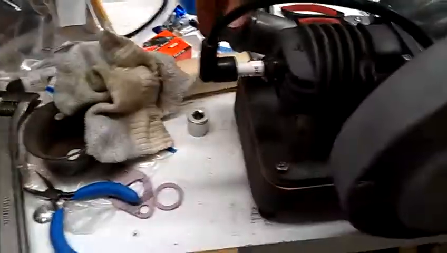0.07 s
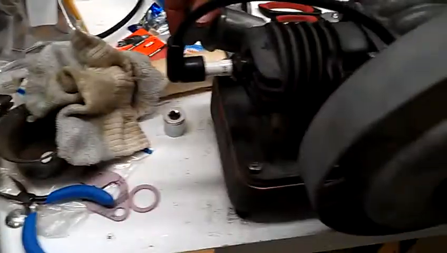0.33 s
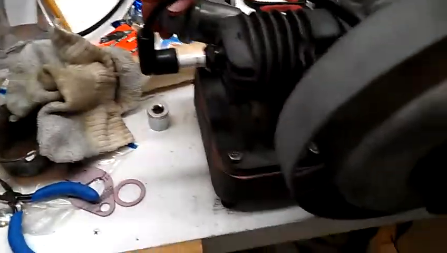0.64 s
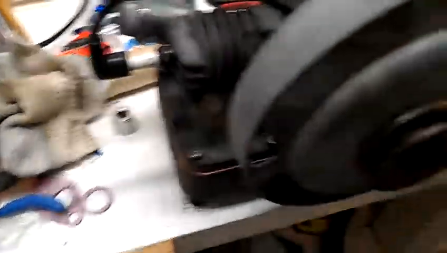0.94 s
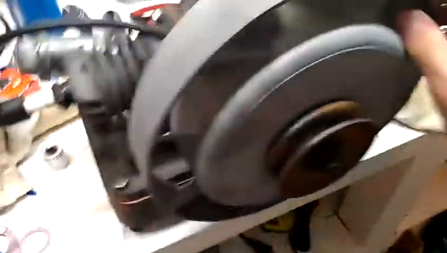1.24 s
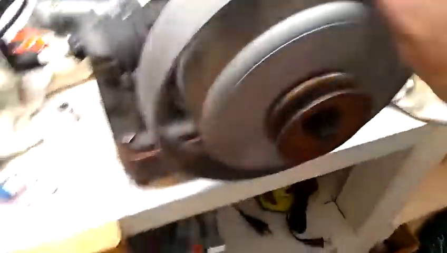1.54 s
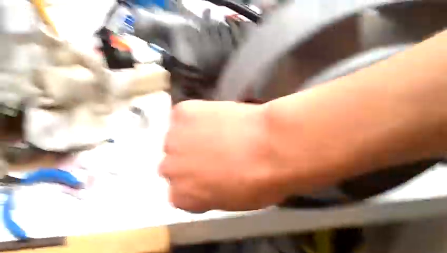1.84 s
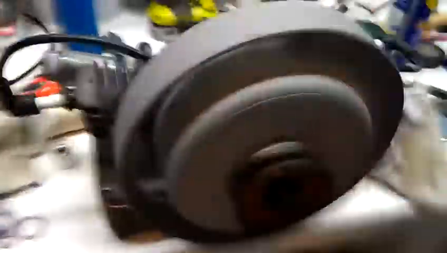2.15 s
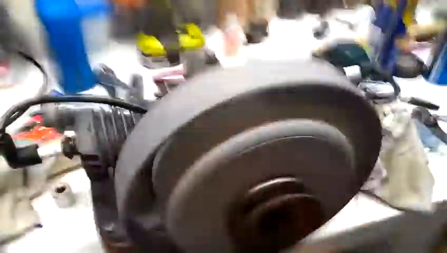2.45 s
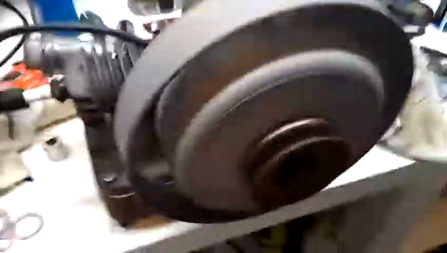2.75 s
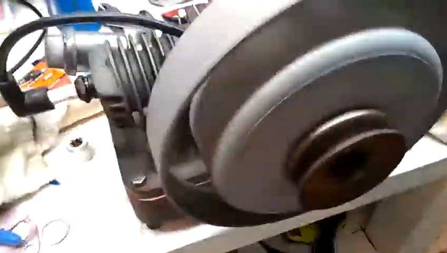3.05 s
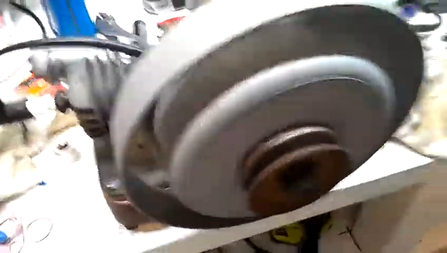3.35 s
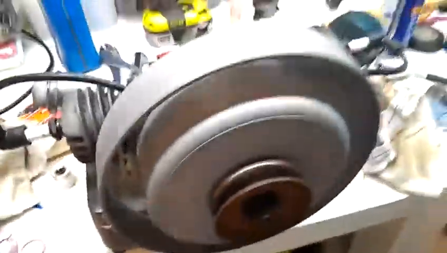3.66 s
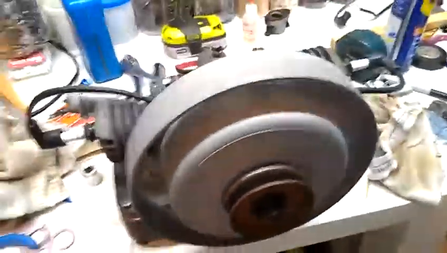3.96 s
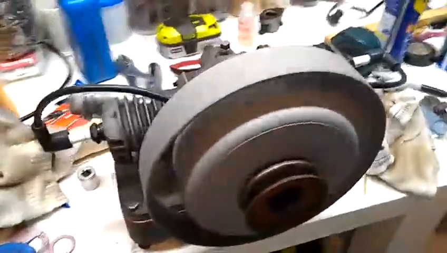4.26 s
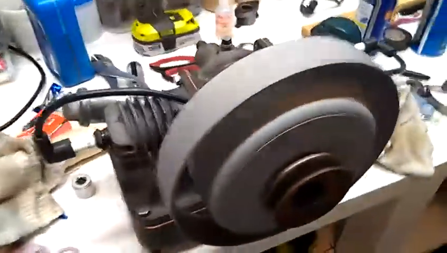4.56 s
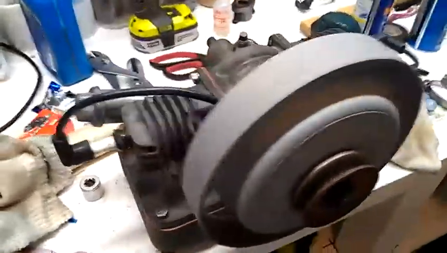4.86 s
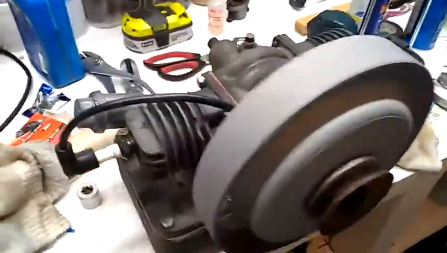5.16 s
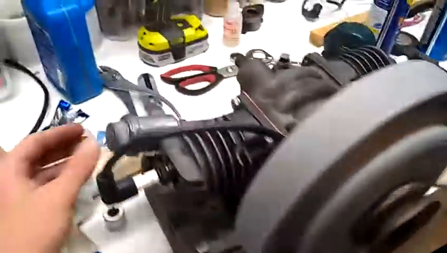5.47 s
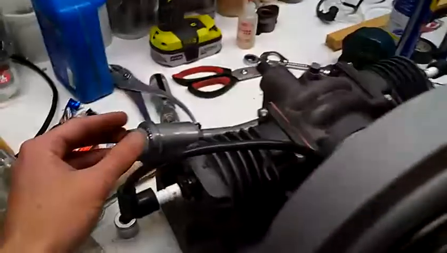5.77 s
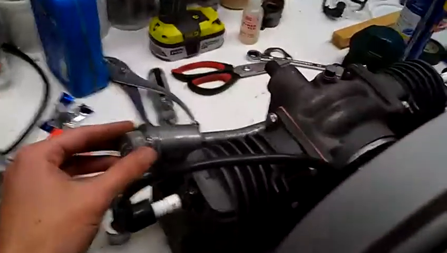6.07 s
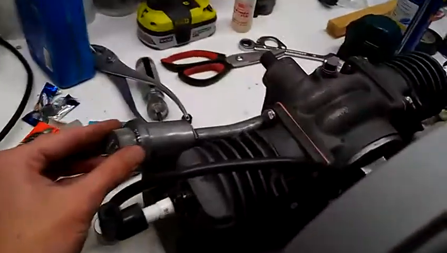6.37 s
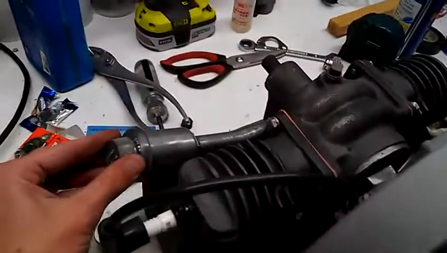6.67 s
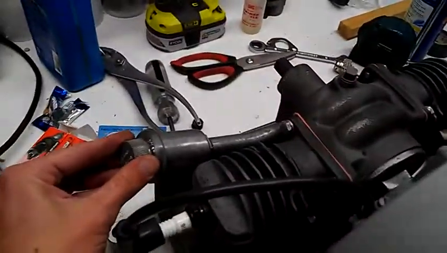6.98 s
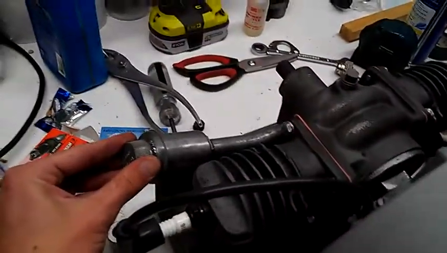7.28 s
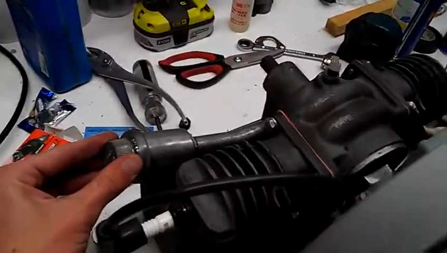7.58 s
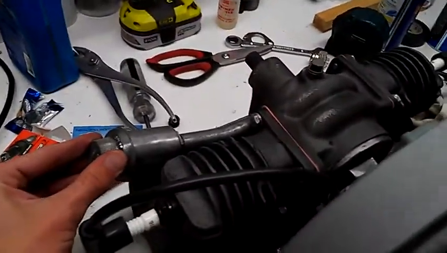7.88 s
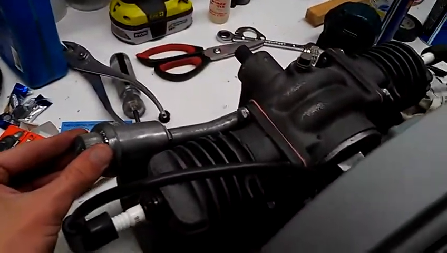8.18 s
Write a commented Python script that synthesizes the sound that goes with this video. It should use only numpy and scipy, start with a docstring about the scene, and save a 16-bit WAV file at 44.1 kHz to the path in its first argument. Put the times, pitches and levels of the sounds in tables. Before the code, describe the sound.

Faint workshop room tone opens. At about 1.2 seconds there is a light metallic scrape, followed from 1.4 to 2.1 seconds by soft rubbing and several ringing knocks as a small old two-stroke engine is turned by hand. At 2.2 seconds it gives a sharp gasp of air and fires. The first exhaust pops are loud, hollow and booming, about three a second, slightly overloading the close microphone, with metal knocks between them. From about 4 seconds the pops come faster and softer and the knocking fades. By 5.5 seconds the engine has settled at nearly six raspy pops a second, with tinny clatter and dull piston thuds in between. Two brief, bright spits come at about 6.7 and 6.9 seconds. The even idle continues until the end, a little past 8 seconds, with a short room ring around each pop.

```python
"""Old two-stroke starting up

A small engine on a workbench is nudged over, spun by hand, catches and settles at six pops a second.
Each open exhaust pop is a chirp as the port cracks open, a hollow bark, a boom and a rasping jet of gas.
Piston and linkage clatter between pops; the workshop rings, and the first pops overload the microphone."""
import sys
import numpy as np
from scipy import signal
from scipy.io import wavfile
from scipy.ndimage import uniform_filter1d

SR = 44100
rng = np.random.default_rng(int(sys.argv[2]) if len(sys.argv) > 2 else 0)


def file_out(sig):
    """Save sig as 16-bit WAV at sys.argv[1]."""
    # one column per channel
    cols = np.atleast_2d(sig).T
    # limit, then scale
    lim = np.clip(cols, -1, 1)
    pcm = np.round(lim * 32767).astype(np.int16)
    wavfile.write(sys.argv[1], SR, pcm)


N = 367353
TIME = np.arange(N) / SR


def amp(db):
    """Decibels to gain."""
    return 10 ** (np.asarray(db) / 20)


def unit_rms(x):
    """Scales to rms 1."""
    return x / np.sqrt(np.mean(x ** 2) + 1e-20)


def at_time(points, s):
    """Reads a control curve at time s."""
    return np.interp(s, *np.transpose(points))


def at_hz(points, hz):
    """Reads a curve on a log-frequency axis."""
    f, value = np.transpose(points)
    return np.interp(np.log(hz + 1), np.log(f + 1), value)


def add(mix, s, sound):
    """Mixes a sound in at time s."""
    part = mix[max(round(s * SR), 0):][:len(sound)]
    part += sound[:len(part)]


def convolve(x, response):
    """Convolution cut to the length of x."""
    return signal.fftconvolve(x, response)[:len(x)]


def colour(points, peaks=(), ripple_db=0, size=4096):
    """Minimum-phase response of energy 1: a smooth EQ, narrow peaks and chance resonances."""
    hz = np.fft.rfftfreq(size, 1 / SR)
    db = at_hz(points, hz) + sum(lift / (1 + (2 * (hz - f) / width) ** 2) for f, width, lift in peaks)
    ripple = unit_rms(uniform_filter1d(uniform_filter1d(rng.standard_normal(len(hz)), size=11), size=7))
    db += ripple_db * np.minimum(ripple, 1.6) * hz / (hz + 700)  # damping caps the chance peaks
    log_gain = np.log(amp(np.r_[db, db[-2:0:-1]]))
    response = np.fft.ifft(np.exp(np.conj(signal.hilbert(log_gain)))).real
    return response / np.linalg.norm(response)


def ring(modes, t):
    """Dying sines of alternating sign, energy 1."""
    wave = sum((-1) ** k * amp(db) * np.exp(-np.log(1000) * t / t60) * np.sin(2 * np.pi * hz * t)
               for k, (hz, db, t60) in enumerate(modes))
    return wave / np.linalg.norm(wave)


def swell(t, rise, power=2):
    """A puff that starts at t = 0 and peaks at 1 after the rise time."""
    u = np.maximum(t, 0) / rise
    return (u * np.exp(1 - u)) ** power


def tone(hz):
    """A sine that follows a moving pitch."""
    return np.sin(2 * np.pi * np.cumsum(hz) / SR)


def turns():
    """Start and length in seconds of each crank turn, from one firing to the next."""
    starts = np.transpose(FIRINGS)[0]
    return zip(starts, np.diff(starts))


# Dull room tone. Each row: frequency in Hz, relative level in dB.
ROOM_TONE_EQ = [(30, -56), (110, -62), (160, -38), (215, -17.5), (370, -9), (580, -5), (820, -1.5),
                (1050, -8), (1400, -15), (2500, -23), (4200, -29), (8500, -39), (13000, -50), (16000, -62)]

def room_tone():
    """Soft background of the workshop, growing as the microphone moves."""
    level_db = -61.5 + np.interp(TIME, [0, 0.5, 1.3, 1.7], [0, 2.5, 5, 15])
    return amp(level_db) * convolve(rng.standard_normal(N), colour(ROOM_TONE_EQ))


# Reverb length. Each row: frequency in Hz, t60 in seconds.
ROOM_DECAY = [(60, 0.086), (180, 1), (330, 0.79), (1000, 0.65), (3000, 0.74), (7000, 0.42), (15000, 0.17)]

def workshop(x, wet_db=-13, build_s=0.0069):
    """Adds a dense tail of reflections, each band dying at its own speed, deep bass soonest."""
    hz, t, bands = signal.stft(rng.standard_normal(SR), SR, nperseg=256)
    decay = np.exp(-np.log(1000) * t / at_hz(ROOM_DECAY, hz)[:, None])
    eq = amp(at_hz([(100, 6.5), (400, -3.5), (900, 2), (16000, 13)], hz))[:, None]
    tail = signal.istft(bands * decay * eq, SR, nperseg=256)[1][:SR]
    tail *= 1 - np.exp(-(TIME[:SR] / build_s) ** 2)
    return x + amp(wet_db) * convolve(x, tail / np.linalg.norm(tail))


# Fader for friction and air. Each row: time in seconds, level in dB.
RUB_LEVEL = [(0, -77), (1.33, -71), (1.42, -51), (1.75, -51.5), (2.01, -43.5), (2.1, -30.5), (2.4, -43),
             (3.2, -38.5), (5, -37.5), (8.33, -40.5)]
# A rub of the hand, then gasps of air as the engine is spun.
# Each row: peak time in seconds, level in dB, rise and fall in seconds.
GASPS = [(.9, -65.5, 0.058, 0.11), (2.177, -14, 0.026, 0.015), (2.208, -10.5, 0.0055, .016),
         (2.31, -33, 0.01, .025)]
# Colour of the rub and gasps. Each row: frequency in Hz, relative level in dB.
AIR_EQ = [(40, -45), (150, -41), (330, 8), (560, -1.5), (900, 10), (1500, 2), (2500, 4.5), (4500, 2.5),
          (8000, -5), (12000, -20), (16000, -35)]
# Fader for the scrape. Each row: time in seconds, level in dB.
SCRAPE_LEVEL = [(1.14, -100), (1.155, -58), (1.215, -54), (1.27, -61), (1.32, -100)]
# Its metallic sheen. Each row: frequency in Hz, rough width in Hz, relative level in dB.
SCRAPE_RINGS = [(3370, 160, -4), (4030, 300, -3), (5200, 200, -7), (6450, 220, -5), (8450, 710, -4)]

def rubbing(rough_db=3.5):
    """Uneven friction and rushing air of the turning engine, and one light scrape."""
    grain = amp(rough_db * unit_rms(uniform_filter1d(rng.standard_normal(N), size=180)))
    gasps = sum(amp(db) * np.exp(-((TIME - s) / np.where(TIME < s, rise, fall)) ** 2)
                for s, db, rise, fall in GASPS)
    rub = unit_rms(grain * rng.standard_normal(N)) * (amp(at_time(RUB_LEVEL, TIME)) + gasps)
    scrape = unit_rms(grain * rng.standard_normal(N)) * amp(at_time(SCRAPE_LEVEL, TIME))
    sheen = ring([(hz, db, 2.6 / width) for hz, width, db in SCRAPE_RINGS], TIME[:SR // 20])
    return convolve(rub, colour(AIR_EQ)) + convolve(scrape, sheen)


# Play in piston and rod being taken up. Each row: position as a share of the turn, accent in dB.
SLAPS = [(0.249, 0), (0.494, 1), (.555, -4), (.708, -5.5), (.77, -1.5)]
# Fader for the clatter. Each row: time in seconds, relative level in dB.
CLATTER_LEVEL = [(2.2, -23.5), (3.3, -16.5), (3.8, -17), (4.6, -18.5), (5, -19.5), (8.2, -21)]
# Its tinny colour. Each row: frequency in Hz, relative level in dB.
CLATTER_EQ = [(40, -56), (140, -27.5), (330, 4.5), (550, -22.5), (900, -0.5), (1450, -4.5), (2200, 2),
              (3200, -3.5), (4100, -4.5), (7000, -9.5), (10000, -11), (16000, -41)]
# Crankcase and flywheel, also rung by the knocks.
# Each row: frequency in Hz, relative level in dB, t60 in seconds.
CASE_MODES = [(355, -2.5, 0.17), (410, -2.5, 0.092), (798.4, -1.5, 0.21), (903, -2, 0.16),
              (963, -12, 0.062), (1165, 0.5, 0.14), (1670, 1.5, 0.084), (1860, -10, .2), (2580, 3.5, 0.088),
              (2664, 4.5, 0.17), (2750, 5, 0.058), (4660, -42, .15)]

def clatter(scatter_turns=0.00507, lag_s=0.007, ping_hz=2250):
    """Light pinging slaps at set crank angles, over a rush of air that hushes before the next pop."""
    t, out = np.arange(SR // 3) / SR, np.zeros(N)
    case = ring(CASE_MODES, t)
    slap = swell(t[:SR // 25], rise=0.003, power=0.86)
    for s, length in turns():
        phase, db = t / length, at_time(CLATTER_LEVEL, s)
        envelope = amp(-11) * np.clip(phase / 0.75, 0, 1) * np.clip((0.88 - phase) / 0.5, 0, 1)  # air
        for share, accent_db in SLAPS:
            late, hard, pitch, clear = rng.standard_normal(4)
            delay = (share + scatter_turns * late) * length + lag_s
            blow = amp(accent_db - 7.5 + 3.5 * hard) * slap
            add(envelope, delay, blow)
            ping = np.sin(2 * np.pi * ping_hz * (1 + 0.12 * pitch) * t[:len(slap)])
            add(out, s + delay, amp(db - 2 + 2 * clear) * blow * ping)
        rattle = amp(db) * envelope * rng.standard_normal(len(t))
        metal = colour(CLATTER_EQ, ripple_db=4.2)
        add(out, s, convolve(rattle, metal) + amp(-10) * convolve(rattle, case))
    return out


# Body of the thud. Each row: frequency in Hz, relative level in dB, t60 in seconds.
THUD_MODES = [(257, -7.5, .08), (339, 2, 0.095), (424, 0.5, 0.057)]

def piston_thuds(share_of_turn=0.44, rise_s=0.009):
    """The piston turns round at the far end of its stroke with a dull thud."""
    t, out = np.arange(SR // 6) / SR, np.zeros(N)
    for s, length in turns():
        modes = [(hz * (1 + 0.027 * rng.standard_normal()), db, t60) for hz, db, t60 in THUD_MODES]
        add(out, s + share_of_turn * length, amp(-1) * ring(modes, t) * (1 - np.exp(-t / rise_s)))
    return out


# Knocks in a slow turn. Each row: share of the turn, then strength, treble and case ring in dB.
ROD_KNOCKS = [(.453, -6.5, -15, -3.5), (.523, -3, -8.5, -6.5), (.591, -8, -21, -19), (.742, -15.5, 39, -1)]
# They fade as the engine gathers speed. Each row: time in seconds, gain in dB.
ROD_FADE = [(2.36, 4), (2.66, -2), (2.97, 0), (3.26, 0.5), (3.55, -3.5), (4.3, -4.5), (4.9, -12)]

def rod_knocks(spread_db=2.6):
    """Cues for rod and piston knocking at the same crank angles while the engine is still slow."""
    cues = []
    for s, length in turns():
        if s < ROD_FADE[-1][0]:
            for share, db, treble_db, ring_db in ROD_KNOCKS:
                when = s + share * length
                db += at_time(ROD_FADE, when) + spread_db * rng.standard_normal()
                cues.append((when, db, treble_db, ring_db))
    return cues


# Knocks while the flywheel is worked by hand; the last four rows make two brief, bright spits at idle,
# like gas blowing back through the intake.
# Each row: start in seconds, then strength, treble and case ring in dB.
KNOCKS_AND_SPITS = [(1.435, -8, -34, -2), (1.579, -17.5, -64, -8), (1.655, -19, -27, -4),
                    (1.822, -11, -42, 0), (1.83, -6.5, -50, -7), (1.944, -20.5, -50, -12),
                    (2.029, -13, -18, -1.5), (2.054, -16.5, -4, -7), (2.091, -2, -24, -11),
                    (6.71, -4, 17, -8), (6.733, -10, 7, -18), (6.887, -1.5, -2, -23),
                    (6.908, -9.5, -1, -10)]
# Colour of the crack. Each row: frequency in Hz, relative level in dB.
KNOCK_EQ = [(40, -22), (90, -39), (170, -33), (320, 0), (550, -7.5), (1050, 9), (1550, -9), (2500, 0),
            (3300, 2.5), (4200, 0.5), (7000, -5.5), (10000, -13), (16000, -36)]

def knocks_and_spits(chatter_s=0.0094, neutral_treble_db=-11, shelf_hz=3500, clink_hz=2450):
    """Each is a chattering crack that rings the crankcase, plus a clink of slightly varying pitch."""
    t, out = np.arange(SR // 4) / SR, np.zeros(N)
    for s, db, treble_db, ring_db in KNOCKS_AND_SPITS + rod_knocks():
        case = ring([(hz, level + 2.1 * rng.standard_normal(), t60) for hz, level, t60 in CASE_MODES], t)
        chatter = rng.standard_normal(len(t)) * np.exp(-t / chatter_s) * (1 - np.exp(-t / 0.0012))
        shelf_db = treble_db - neutral_treble_db
        eq = [(hz, level + shelf_db * hz ** 2 / (hz ** 2 + shelf_hz ** 2)) for hz, level in KNOCK_EQ]
        crack = convolve(chatter, colour(eq, ripple_db=4))
        add(out, s, amp(db - 10) * (crack + amp(ring_db) * np.linalg.norm(chatter) * case))
        clink = np.sin(2 * np.pi * clink_hz * (1 + 0.043 * rng.standard_normal()) * t)
        add(out, s, amp(db - 15) * swell(t, rise=0.0029, power=1) * clink)
    add(out, 1.948, amp(-2.5) * ring([(710, -1, 0.34), (1220, 6.5, 0.054)], t))  # one lower note
    return out


# Modes of exhaust and bench. Each row: frequency in Hz, relative level in dB,
# t60 at idle in seconds, dB gained per dB of extra boom.
BOOM_MODES = [(121, -27.5, 0.16, 1.5), (179, -7.5, 0.11, 0.48), (209, -9.5, 0.066, 1.38),
              (276.5, -17, 0.26, 1.45), (305.3, -11, 0.24, 1.37), (343.4, 3, 0.23, 0), (385, 2.5, 0.19, 0),
              (450.3, 5.5, 0.12, -2.7), (740, -3.5, 0.16, -2), (765, -6.5, 0.1, -0.5),
              (973, -4.5, 0.31, 0.06), (980, -18, 0.082, -8), (1138, 1, 0.13, 0.66)]

def boom(t, extra_db, force):
    """A firing rings exhaust and bench; harder ones boom deeper and are damped sooner."""
    modes = [(hz * (1 + 0.0077 * rng.standard_normal()), db + growth * extra_db, t60 / (1 + 0.11 * force))
             for hz, db, t60, growth in BOOM_MODES]
    return ring(modes, t) * (1 - np.exp(-t / 0.0082))


# Puffs lengthen as the engine settles. Each row: time in seconds, cylinder emptying time in seconds.
BLOWDOWN = [(2.2, 0.018), (3.05, 0.026), (3.9, 0.029), (4.4, 0.039), (5.3, 0.046), (8.3, 0.05)]
# Rasp of the jet. Each row: frequency in Hz, relative level in dB.
JET_EQ = [(30, -22), (90, -41), (160, -16), (300, 2), (450, -2), (600, -6.5), (860, 0), (1400, -5.5),
          (2400, 3), (3300, -1), (4200, -2.5), (7000, -4), (10500, -9.5), (16000, -22)]
# Resonances of the exhaust passage. Each row: frequency in Hz, width in Hz, lift in dB.
PIPE_PEAKS = [(1897, 220, 1.5), (2500, 38, -4), (2680, 90, 4.5), (4030, 380, 6), (4547, 116, 4.5),
              (5515, 420, 3.5), (6040, 62, 8), (7880, 94, 7.5), (8120, 190, 2.5), (8650, 100, 5.5)]

def gas_jet(t, s, turbulence, force, whistle_hz, lead_s, surge_s=0.0173):
    """Gas leaks as the piston uncovers the port, then the cylinder blows down and surges once more."""
    empty_s = at_time(BLOWDOWN, s)
    since_open = np.maximum(t - lead_s, 0)
    leak = amp(-17) * swell(t, lead_s, power=1)
    opening = 1 - np.exp(-since_open / 0.00086)
    emptying = np.exp(-(since_open / empty_s) ** (1.71 + 0.085 * force))
    surge = 0.14 * swell(since_open - surge_s, rise=0.001, power=0.68) * np.exp(-surge_s / empty_s)
    throaty_eq = [(hz, db + 0.41 * force / (1 + (hz / 1500) ** 2)) for hz, db in JET_EQ]
    passage = colour(throaty_eq, PIPE_PEAKS + [(whistle_hz, 280, 6)], ripple_db=3)
    return convolve((leak + opening * emptying + surge) * turbulence, passage)


# Port chirp, strongest while the engine speeds up. Each row: time in seconds, relative level in dB.
CHIRP_LEVEL = [(2.5, -30), (3.1, -18), (4.8, -16.5), (5.05, -20), (6.3, -22.5), (8.3, -21.5)]
# The pops. Each row: time in seconds, strength in dB, bark trim in dB, whistle of the jet in Hz.
FIRINGS = [(2.215, -12, 2.5, 3650), (2.5142, -9.5, -2, 4560), (2.8109, -8.5, 5.5, 4160),
           (3.1133, -7, 4.5, 4000), (3.4009, -9, -2, 3900), (3.6781, -8, 5, 3970), (3.9362, -12.5, 2, 5360),
           (4.1791, -12.5, 0, 4800), (4.405, -17, -3.5, 4500), (4.6159, -16, -3.5, 4060),
           (4.8185, -17, -1, 3730), (5.0113, -18, -4.5, 4300), (5.2039, -18, -3, 4340),
           (5.3911, -18, -7, 4850), (5.575, -17.5, -4.5, 4600), (5.7534, -17.5, -11, 5280),
           (5.9288, -18, -15, 4200), (6.1049, -18, -9, 4180), (6.2761, -18.5, -7, 5150),
           (6.45, -18.5, -9, 4600), (6.6238, -18, -7, 3760), (6.7983, -19.5, -9, 4160),
           (6.977, -18.5, -6, 4150), (7.1579, -18, -5.5, 3920), (7.3336, -18, -11, 4260),
           (7.5127, -18.5, -4.5, 5130), (7.6858, -18, -11, 5350), (7.8538, -18, -6, 5960),
           (8.016, -19.5, -10, 5550), (8.1768, -18.5, -11, 3940), (8.3315, -14, -9, 4340)]

def exhaust(lead_s=0.0072, chirp_hz=2330, bark_hz=860, thump_hz=72, idle_db=-18, shock_share=0.24):
    """Each firing: port chirp, pipe bark, a boom with a low thump, and a turbulent jet."""
    t, out = np.arange(SR // 5) / SR, np.zeros(N)
    shocks = rng.standard_normal(len(t))  # the shock pattern of the port repeats from pop to pop
    for s, db, bark_db, whistle_hz in FIRINGS:
        eddies, drift = rng.standard_normal((2, len(t)))
        chirp_tune, bark_tune = rng.standard_normal(2)
        waver = unit_rms(uniform_filter1d(drift, size=90))
        boom_db = -27.5 + 1.37 * (db - idle_db)
        extra_db = boom_db + 26  # boom beyond that of an ordinary pop
        force = max(extra_db, 0)

        chirp = tone(chirp_hz * (1 + 0.018 * chirp_tune) * (1 + 0.092 * waver))
        chirp *= swell(t, rise=0.0028, power=0.89)
        add(out, s - lead_s - 0.000232 * force, amp(at_time(CHIRP_LEVEL, s) + 5) * chirp)
        bark = tone(bark_hz * (1 + 0.034 * bark_tune) * (1 + 0.065 * waver))
        add(out, s - lead_s, amp(db + bark_db + 2) * swell(t, rise=0.007, power=2.46) * bark)

        add(out, s - 0.003, amp(boom_db + 35) * boom(t, extra_db, force))
        thump = swell(t, rise=0.0046) * np.sin(2 * np.pi * thump_hz * t)
        add(out, s, amp(boom_db - 33 + 0.79 * extra_db) * thump)

        turbulence = np.sqrt(shock_share) * shocks + np.sqrt(1 - shock_share) * eddies * amp(1.9 * waver)
        add(out, s - lead_s, amp(db + 4) * gas_jet(t, s, turbulence, force, whistle_hz, lead_s))
    return out


def scene():
    """The engine in its room, in mono."""
    engine = exhaust() + knocks_and_spits() + piston_thuds() + clatter() + rubbing()
    return (workshop(engine) + room_tone())[None]


def record(dry, ceiling=0.61, low_cut_hz=62, high_cut_hz=16000):
    """The close microphone flattens the strongest pops; the deepest bass and top treble are cut."""
    clipped = dry / (1 + (dry / ceiling) ** 4) ** (1 / 4)
    low_cut = signal.butter(2, low_cut_hz, "high", fs=SR, output="sos")
    high_cut = signal.firwin(401, high_cut_hz, window=("kaiser", 9), fs=SR)
    return signal.oaconvolve(signal.sosfilt(low_cut, clipped), high_cut[None], "same")


dry = scene()
out = record(dry)
file_out(out)
```